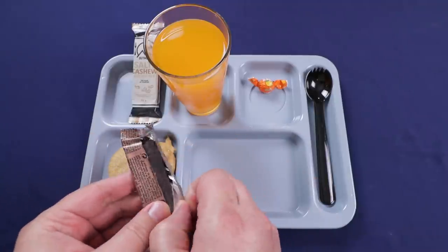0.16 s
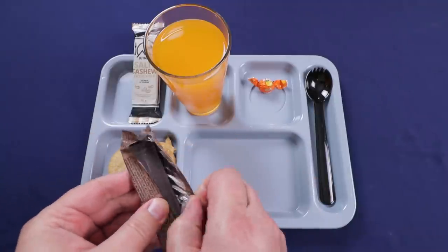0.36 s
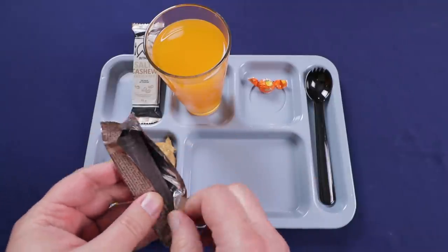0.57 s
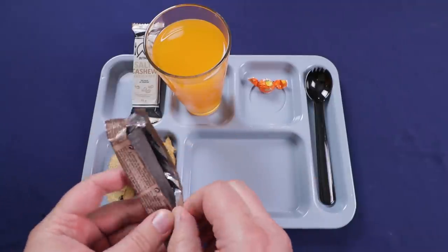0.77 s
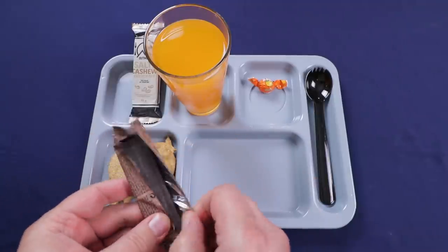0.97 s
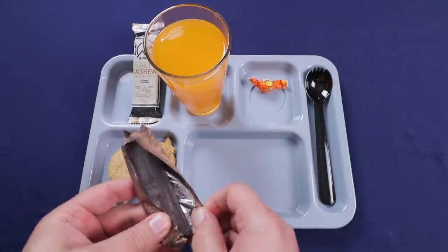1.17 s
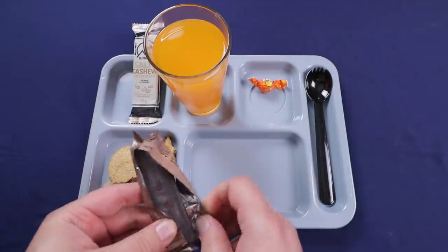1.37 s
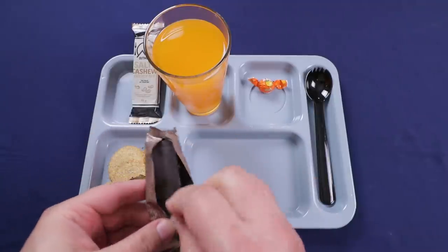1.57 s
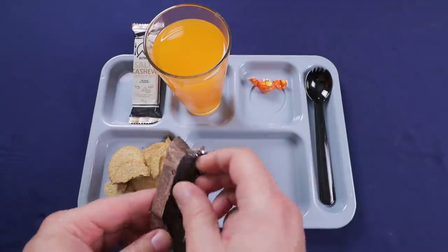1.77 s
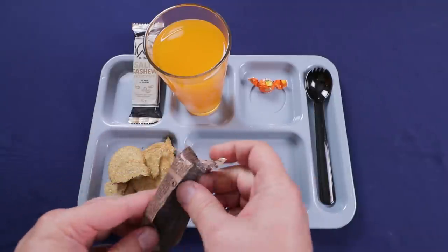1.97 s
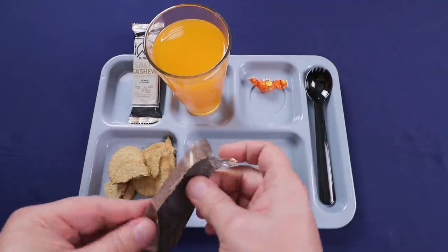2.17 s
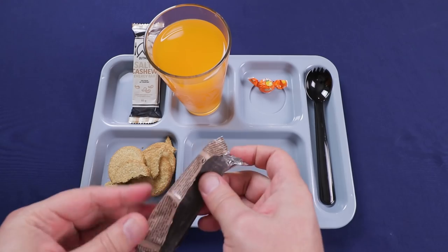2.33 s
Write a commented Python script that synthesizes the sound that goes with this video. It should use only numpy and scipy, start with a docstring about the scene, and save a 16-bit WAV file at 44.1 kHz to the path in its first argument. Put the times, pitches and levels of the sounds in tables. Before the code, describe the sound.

Crisp crinkling of a foil wrapper being pulled off a candy bar, heard up close in a small room. An early flurry of snaps leads to busier crackling, a short lull, then lighter crinkles, over a faint steady hum.

```python
"""A foil-lined wrapper is peeled off a candy bar, just above a plastic tray in a small room.
Its creases buckle in sharp snaps: each flexes the sheet, rings one facet and cracks in the treble.
Whole panels pop with a ring and a thump, tiny creases crackle between, and the glued seam sizzles.
The tray reflects the buckling, the open sleeve resonates and the room reverberates,
over a low appliance hum."""
import sys
import numpy as np
from scipy import signal
from scipy.fft import rfft, irfft
from scipy.io import wavfile
from scipy.ndimage import uniform_filter1d

SR = 44100
rng = np.random.default_rng(int(sys.argv[2]) if len(sys.argv) > 2 else 0)


def bounce(signal):
    """Save signal as a 16-bit WAV file at the path given by the first command-line argument."""
    frames = np.transpose(np.atleast_2d(signal))
    limited = np.clip(frames, -1, 1)
    pcm = np.round(limited * 32767).astype(np.int16)
    wavfile.write(sys.argv[1], SR, pcm)


N = 105840
LEVEL_WINDOW_S = 0.004  # a crease's level is its energy averaged over this time


def amp(db):
    """Amplitude ratio: a factor of ten for every 20 dB."""
    return 10 ** (np.asarray(db) / 20)


def unit(x):
    """Energy normalisation: the squares of each row sum to 1."""
    return x / np.sqrt(np.sum(x ** 2, axis=-1, keepdims=True) + 1e-20)


def band(x, edges_hz, order=2):
    """Causal Butterworth band-pass filtering."""
    return signal.sosfilt(signal.butter(order, edges_hz, "band", fs=SR, output="sos"), x)


def colour(x, points):
    """Zero-phase spectral shaping through (f/Hz, level/dB) points."""
    hz, db = np.array(points, float).T
    f = np.maximum(np.fft.rfftfreq(len(x), 1 / SR), 1)
    return irfft(rfft(x) * amp(np.interp(np.log(f), np.log(hz), db)), len(x))


def resonance(f, hz, q):
    """Frequency response of a damped oscillator, one row for each natural frequency."""
    s = 1j * f / hz[:, None]
    return (s / q) / (1 + s / q + s ** 2)


def appliance():
    """Superposition: steady mains and fan tones stand on low broadband air noise."""
    # air noise spectrum: f/Hz, relative level/dB
    air_spectrum = [(20, -15), (45, 1), (75, 0.5), (130, 0), (190, 0.5), (280, 4), (380, -2.5), (500, -1.5),
                    (900, -9.5), (1500, -14.5), (3200, -32), (8000, -33), (16000, -29)]
    # mains and fan tones: f/Hz, level/dB
    tones = [(60, -69.5), (120, -70.5), (269.2, -70.5), (306.8, -73.5), (360.3, -71.5)]
    t = np.arange(N) / SR
    air = unit(colour(rng.standard_normal(N), air_spectrum)) * np.sqrt(N) * amp(-63)
    hum = sum(np.sqrt(2) * amp(db) * np.sin(2 * np.pi * (hz * t + rng.random())) for hz, db in tones)
    return air + hum


def room(x, low_t60_s=0.27, treble_t60_s=0.26, gap_s=0.0049):
    """Reverberation: after a short gap, diffuse reflections merge into an exponentially decaying tail."""
    # colour of the reverberation: f/Hz, relative level/dB
    tail_spectrum = [(300, -4), (700, -9.5), (1200, -2), (2200, -5), (2950, -4.5), (3700, -5.5),
                     (4700, -4.5), (6000, -9.5), (9000, -8.5), (16000, -3)]
    t = np.arange(SR // 2) / SR
    noise = rng.standard_normal(len(t))
    low = signal.sosfiltfilt(signal.butter(2, 5500, fs=SR, output="sos"), noise)
    decay = low * 1000 ** (-t / low_t60_s) + (noise - low) * 1000 ** (-t / treble_t60_s)
    onset = np.clip(t / gap_s - 0.5, 0, 1)
    response = rfft(decay * onset)
    whitened = irfft(response / uniform_filter1d(np.abs(response), size=24), len(t))
    tail = colour(unit(whitened * onset), tail_spectrum)
    return amp(-4) * signal.fftconvolve(x, tail[:SR * 2 // 5])[:N]


def sleeve(x, modes_hz=(3230, 3700), t60_s=0.35):
    """Resonance: the foil excites a cluster of close modes in the open sleeve, which ring on faintly."""
    t = np.arange(SR // 2) / SR
    ring = band(rng.standard_normal(len(t)), modes_hz) * 1000 ** (-t / t60_s)
    return amp(-19) * signal.fftconvolve(x, unit(ring))[:N]


def sizzle(band_hz=(11300, 15400)):
    """Adhesive fracture: glue lets go along the seam in countless tiny ticks."""
    # peels of the seam: centre t/s, half length/s, level/dB
    peels = [(1.034, 0.017, -52), (1.274, 0.024, -53)]
    t = np.arange(N) / SR
    ticks = band(rng.standard_normal(N) * np.exp(rng.standard_normal(N)), band_hz)
    envelope = sum(amp(db) * np.exp(-((t - at) / half) ** 2) for at, half, db in peels)
    return unit(ticks) * np.sqrt(N) * envelope


def buckles(times, flex_db, ring_db, crack_db, facet_hz, slip_scale=1, size=1024):
    """Buckling: a crease's jump and dying slips drive sheet, facet and crack; the tray adds an echo."""
    t, f = np.arange(size) / SR, np.fft.rfftfreq(size, 1 / SR)
    chance = rng.standard_normal((len(times), 2, size))
    jump = np.sign(chance[:, 0, :1]) * (t == 0)
    slips = chance[:, 0] * np.exp(0.79 * chance[:, 1])  # uneven, log-normal strengths
    echo_s = 0.002 * np.exp(0.199 * chance[:, 1, -1:])
    tray = 1 + amp(-8) * np.exp(-2j * np.pi * f * echo_s)

    def drive(decay_s, response=1):
        """Source and filter: the force of jump and slips passes through the echo and a response."""
        force = jump + 1.23 * unit(slips * np.exp(-t / decay_s))
        return irfft(rfft(force) * tray * response)

    broad_hump = resonance(f, facet_hz, q=0.93) ** 2
    facet = broad_hump * (1 + amp(4) * resonance(f, facet_hz, q=4.8))
    overtone = 1 + amp(14) * resonance(f, 1.42 * facet_hz, q=4.8)
    flex = band(drive(0.0034 * slip_scale), (630, 1690), order=3)
    ring = drive(0.0025 * slip_scale, facet)
    sharp = drive(0.0011 * slip_scale, overtone)
    crack = band(sharp, (4760, 9670)) - amp(-27) * band(sharp, (9670, 18000))
    parts = (flex, flex_db + 1), (ring, ring_db + 3), (crack, crack_db - 4.5)
    sounds = sum(unit(part) * amp(db)[:, None] for part, db in parts) * np.sqrt(LEVEL_WINDOW_S * SR)
    out = np.zeros(N + size)
    for start, sound in zip(np.clip(times * SR, 0, N).astype(int), sounds):
        out[start:start + size] += sound
    return out[:N]


def crackle(creases_per_s=850, spread_db=4.5):
    """Incoherent summation: tiny creases of random size and pitch add in power as the fingers work."""
    # strength of the crackle: t/s, relative body level/dB, relative treble level/dB
    contour = [(0, -61.5, -50.5), (0.09, -56.5, -69), (0.19, -66.5, -54.5), (0.27, -53, -78),
               (0.297, -37, -39), (0.32, -34, -42), (0.345, -45.5, -39), (0.375, -46, -65),
               (0.44, -60, -50.5), (0.485, -62, -88), (0.516, -44, -59), (0.57, -66.5, -51.5),
               (0.64, -54.5, -61), (0.7, -69, -69), (0.769, -44, -44), (0.82, -54.5, -59), (0.88, -58, -57),
               (0.95, -52, -55), (1.02, -50.5, -40.5), (1.059, -35.5, -46), (1.1, -54.5, -44),
               (1.16, -53.5, -50), (1.23, -55, -39.5), (1.29, -45.5, -39), (1.34, -44, -53),
               (1.4, -69, -47), (1.44, -47, -61), (1.47, -57, -50), (1.56, -59, -97), (1.62, -73, -61),
               (1.72, -73, -101), (1.765, -59, -78), (1.787, -41.5, -66), (1.82, -54.5, -63),
               (1.85, -46, -57), (1.92, -55.5, -41.5), (2.01, -50, -43), (2.05, -50, -42), (2.09, -61, -59),
               (2.138, -44, -61), (2.19, -62, -52), (2.27, -54, -58), (2.32, -65.5, -46.5),
               (2.36, -50.5, -66), (2.4, -67, -68)]
    at, body_curve, treble_curve = np.array(contour, float).T
    count = int(creases_per_s * N / SR)
    jitter, strength, brightness, pitch = rng.standard_normal((count, 4)).T
    times = np.abs(np.arange(count) + jitter) / creases_per_s
    size_db = spread_db * np.minimum(strength, 2)
    size_db -= 10 * np.log10(np.mean(amp(size_db) ** 2) * creases_per_s * LEVEL_WINDOW_S)  # unit power
    body_db = np.interp(times, at, body_curve) + size_db
    treble_db = np.interp(times, at, treble_curve) + size_db
    return buckles(times, flex_db=body_db - 9.5 - 2 * brightness, ring_db=body_db - 3,
                   crack_db=treble_db - 3 + 2 * brightness, facet_hz=3400 * np.exp(0.3 * pitch),
                   slip_scale=0.53)  # tiny creases stop slipping sooner


def pops(thump_hz=800, thump_decay_s=0.00096, tick_decay_s=0.00058, tray_echo_s=0.001405, size=1024):
    """Snap-through: a panel flips and rings, the shaken packet thumps and the edge crease ticks."""
    # panels, levels before filtering: t/s, ring level/dB, f/Hz, decay/s, thump level/dB, tick level/dB
    panels = [(0.2799, -15, 2810, 0.0014, -31, -11.5), (0.3203, -30, 2880, 0.00088, -20.5, -23),
              (0.358, -11, 3190, 0.00079, -54, -7.5), (0.4963, -24, 2800, 0.00074, -44, -35),
              (1.5157, -14.5, 2500, 0.00033, -22, -14.5), (1.7358, -27.5, 2060, 0.00038, -34.5, -33),
              (2.0365, -22, 2500, 0.00073, -46, -21)]
    t = np.arange(size) / SR
    out = np.zeros(N + 2 * size)
    for at, ring_db, hz, decay_s, thump_db, tick_db in panels:
        ring = amp(ring_db) * np.sin(2 * np.pi * hz * t) * np.exp(-t / decay_s)
        thump = amp(thump_db) * np.sin(2 * np.pi * thump_hz * t) * np.exp(-t / thump_decay_s)
        burst = rng.standard_normal(size) * np.exp(-t / tick_decay_s)
        tick = amp(tick_db) * unit(band(burst, (4000, 7600), order=1))
        start = int(at * SR)
        out[start:start + size] += band(ring + thump + tick, (670, 8300))  # what the sheet radiates
    echo = amp(-11) * np.roll(out, int(tray_echo_s * SR))
    return (out + echo)[:N]


def snaps():
    """Elastic energy release: the large creases buckle one by one."""
    # large creases: t/s, relative flex, ring and crack level/dB, facet f/Hz
    creases = [(0.0226, -61.5, -45, -56, 5330), (0.1218, -56.5, -63, -49.5, 4370),
               (0.2139, -51, -47, -37.5, 5770), (0.2186, -42.5, -40, -31.5, 2560),
               (0.2353, -54, -46, -63, 3500), (0.2815, -39.5, -31.5, -37, 3200),
               (0.2962, -37, -39, -45, 2140), (0.3069, -44, -45, -43, 3350),
               (0.3111, -49, -35.5, -48, 3550), (0.3137, -60, -34.5, -43, 1770),
               (0.3259, -37.5, -38.5, -49, 4350), (0.332, -60, -45, -32, 3470.0),
               (0.3402, -54, -36.5, -45, 4670), (0.3561, -47.5, -32.5, -58, 1840),
               (0.494, -50, -46, -51, 4200), (0.5116, -66, -50, -44, 4700), (0.5134, -40, -38.5, -48, 3010),
               (0.5418, -47.5, -43.5, -43, 3900), (0.5615, -46.5, -39.5, -37, 3340),
               (0.628, -65, -63, -53, 3300), (0.7279, -53, -51, -43.5, 2950),
               (0.7501, -71, -41.5, -30.5, 2980), (0.7654, -45, -41, -59, 5360),
               (0.7706, -64, -42, -48, 5430), (0.789, -73, -46, -46, 5400), (0.84, -53.5, -50.5, -51, 3060),
               (0.8982, -55, -51, -41, 4800), (0.9367, -75, -45, -35, 2220),
               (0.9436, -50, -41.5, -47, 5500), (0.9727, -59, -44.5, -38.5, 3400),
               (1.0015, -47.5, -41.5, -33, 2970), (1.0312, -59, -48, -48, 4000),
               (1.046, -35.5, -33, -22.5, 3000), (1.0477, -41, -32, -31, 5230),
               (1.0555, -46, -36, -31, 3020), (1.0935, -66, -37.5, -53, 2980),
               (1.1064, -43, -33, -37, 4270), (1.1385, -69, -34.5, -38, 4340),
               (1.1809, -50.5, -38, -40, 3140), (1.194, -52, -41, -45.0, 4300),
               (1.2039, -73, -35.5, -26, 1730), (1.2063, -43, -31.5, -54, 3420),
               (1.2194, -54, -43, -35, 3720), (1.2602, -63, -45, -46, 5200), (1.294, -42.5, -39, -37, 5400),
               (1.3202, -45, -39.5, -46, 3370), (1.3528, -38.5, -38, -40.0, 4160.0),
               (1.3643, -45, -39, -44.0, 4270), (1.3765, -49, -36.5, -39, 4300),
               (1.3914, -57, -38.5, -55, 3740), (1.4223, -41, -41.5, -61, 3730),
               (1.4288, -49, -42.5, -62, 4400), (1.444, -48, -44, -34.5, 3220),
               (1.496, -44.5, -39.5, -59, 3600), (1.5953, -54, -53, -47, 3500),
               (1.7729, -52, -38.5, -65, 3840), (1.7902, -44.5, -40, -41, 3520),
               (1.842, -41.5, -38.5, -39, 3820), (1.8527, -68, -42, -67, 4300),
               (1.8657, -47, -39.5, -41, 1970), (1.929, -80, -36, -31, 3660), (1.962, -68, -38, -62, 5030),
               (1.9962, -60, -46.5, -32, 3380), (2.0037, -77, -41, -54, 3520),
               (2.0397, -45, -39, -43, 3750), (2.0547, -77, -42.5, -53, 5570),
               (2.1195, -60, -43, -35, 4500), (2.1373, -74, -38.5, -29.5, 4100),
               (2.207, -63, -46.5, -51, 5030), (2.2362, -76, -48, -43, 3230),
               (2.2747, -52.5, -43, -47, 4900), (2.357, -49, -48, -40, 3000),
               (2.3746, -52.5, -48, -46, 3230)]
    return buckles(*np.array(creases, float).T)


def scene():
    """Superposition of the foil's direct sound, the responses of sleeve and room, and the hum."""
    hum = appliance()
    foil = snaps() + pops() + sizzle() + crackle()
    return (foil + sleeve(foil) + room(foil) + hum)[None]


def record(dry, cutoff_hz=16000):
    """Band limiting: a steep elliptic low-pass removes the highest treble."""
    return signal.sosfilt(signal.ellip(10, 0.2, 70, cutoff_hz, fs=SR, output="sos"), dry)


dry = scene()
out = record(dry)
bounce(out)
```